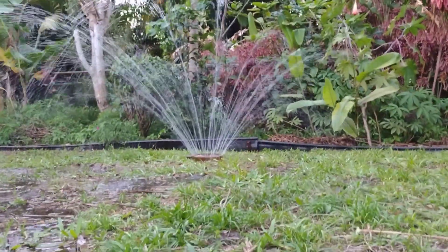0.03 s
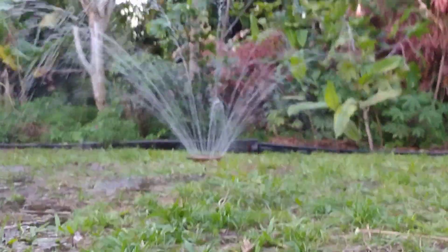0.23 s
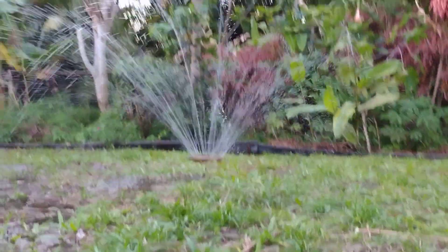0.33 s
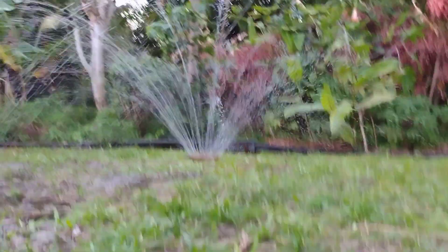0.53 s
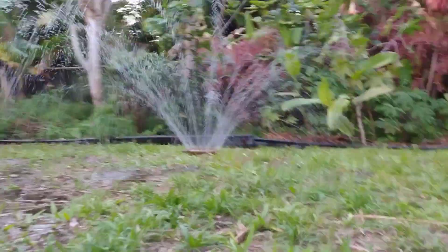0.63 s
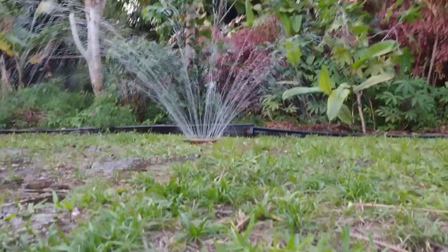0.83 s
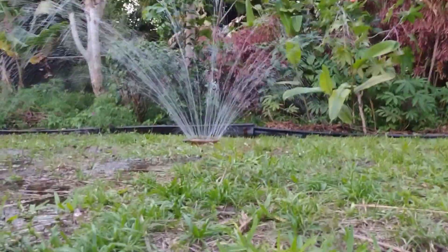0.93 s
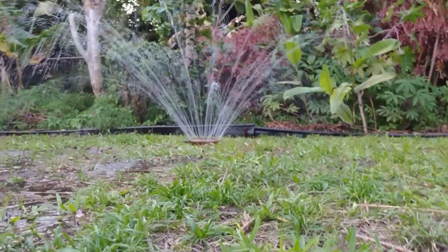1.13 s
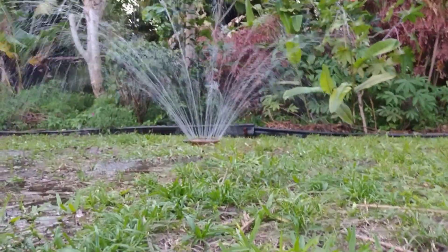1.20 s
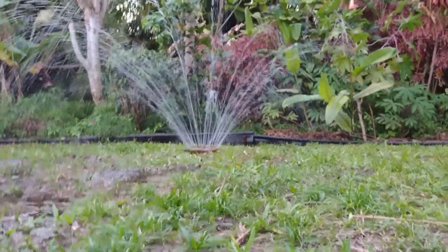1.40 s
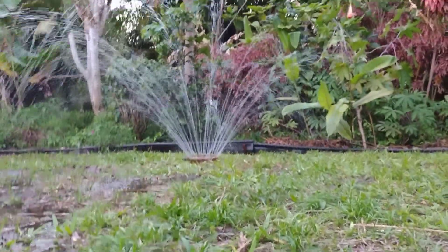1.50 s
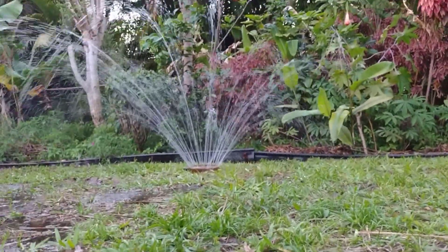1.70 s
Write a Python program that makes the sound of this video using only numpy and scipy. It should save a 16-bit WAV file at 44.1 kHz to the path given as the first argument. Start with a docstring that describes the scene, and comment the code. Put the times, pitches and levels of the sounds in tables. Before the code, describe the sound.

Steady sprinkler spray pattering on grass over low wind rumble, interrupted by close handling rustle and ticks.

```python
"""A garden sprinkler hisses and patters on a lawn, over a low rumble of wind.
The water is steady noise plus many tiny rings, one for each drop; the wind is low filtered noise.
Then something, probably a hand, rubs close to the right microphone: a few scuffs, a swelling rustle
of tiny slips with a bright swish, soft bumps and sharp ticks. They are noise bursts and short rings.
Over the first second the spray slowly fades into a slightly different colour."""
import sys
import numpy as np
from scipy import signal
from scipy.fft import rfft, irfft
from scipy.io import wavfile

SR = 44100
rng = np.random.default_rng(int(sys.argv[2]) if len(sys.argv) > 2 else 0)


def dump(signal):
    """Clip the signal to [-1, 1] and save it as 16-bit WAV at the path in sys.argv[1]."""
    limited = np.clip(np.atleast_2d(signal).T, -1, 1)
    pcm = np.round(limited * 32767).astype(np.int16)
    wavfile.write(sys.argv[1], SR, pcm)


N = 77175  # length in samples, 1.75 s
T = np.arange(N) / SR  # time of every sample, s

# Colour of the spray, before its level curve, early and late:
# pitch_hz, then early_left, early_right, late_left, late_right (all dB per Hz)
SPRAY_COLOUR = [(830,-99,-97,-94.5,-94), (1460,-108,-104,-103,-99.5), (2170,-108,-103,-104,-99),
                (2930,-109,-95.5,-105,-88), (3180,-109,-99,-104.5,-94.5), (4210,-107,-91,-103.5,-93),
                (4920,-105,-91.5,-101.5,-105), (6490,-106,-105,-97.5,-110), (7500,-110,-114,-108,-117),
                (9100,-108,-117,-105,-113), (13000,-116,-112,-113,-109.5)]
# Slow changes in the strength of the spray: time_s, left_db, right_db
SPRAY_LEVEL = [(0,-0.4,-1.1), (1.37,1.5,0.35), (1.5,-2.5,-1)]
# Colour of the fine sharp drops: pitch_hz, relative_db
FINE_COLOUR = [(5000,-10), (9500,14), (15000,15)]
TURN_START_S, TURN_END_S = 0.049, 1  # the spray fades from early to late colour
DROPS_PER_S, DROP_SPREAD_DB = 3500, 4
PATTER_SHARE = 0.38  # part of the water's power that is patter, before colouring
DROP_CYCLES, DROP_LOW_HZ, DROP_HIGH_HZ = 9.5, 1670, 16200
FINE_DROPS_PER_S, FINE_DB = 60, -82  # dB before the spray's level curve

# Strength of the rub: time_s, left_db, right_db
RUB_LEVEL = [(.45,-66,-72), (.52,-57.5,-57.5), (.585,-61,-55.5), (.64,-55,-47), (.675,-43.5,-46.5),
             (.69,-48.5,-38), (.745,-48.5,-41), (.775,-42,-34.5), (.795,-51,-37.5), (.818,-42.5,-31),
             (.885,-55,-42.5), (.925,-44.5,-31), (.955,-47,-37.5), (.972,-63,-52.5), (1.04,-57,-49),
             (1.11,-67,-61.5)]
# Colour of the rub: pitch_hz, left_db, right_db
RUB_COLOUR = [(298,5,-3.5), (610,-3,-10.5), (747,5,-1), (930,-0.5,-5.5), (1490,1.5,-1), (1920,1.5,3),
              (2730,-7,3), (4290,-13.5,-7.5), (5440,-7.5,-29), (7560,-24,-30.5)]
# Low rumble of the rubbed camera body: time_s, left_db, right_db
BODY_LEVEL = [(.48,-53.5,-54), (.56,-54.5,-53), (.76,-66,-54), (.83,-40,-35), (.88,-44,-44),
              (.97,-46,-45.5), (1.07,-49.5,-51)]
# Colour of that rumble: pitch_hz, relative_db
BODY_COLOUR = [(50,-20), (175,3.5), (270,-11), (900,-24)]
RUB_EDGE_DB_PER_S = 250  # how fast rub sounds fall away outside their tables
SLIPS_PER_S, SLIP_SPREAD_DB = 3500, 2
AIR_PEAK_S, AIR_WIDTH_S = 0.75, 0.16  # airy top of the rub
AIR_RIGHT_DB, AIR_LEFT_DB = -69, -78

# Strength of the bright swish: time_s, left_db, right_db
SWISH_LEVEL = [(.5,-60.5,-65), (.52,-50.5,-64), (.58,-69,-65), (.652,-68,-59), (.672,-44,-47),
               (.72,-70,-53), (.77,-68,-46.5), (.82,-67,-45.5), (.85,-66,-49)]
# Sinking centre of the swish: time_s, pitch_hz
SWISH_PITCH = [(.66,5830), (.77,4630), (.84,3520)]
SWISH_WIDTH_HZ = 2080  # width of each of its two resonances

# Short scuffs: start_s, length_s, left_db, right_db
SCUFFS = [(0.248,0.0057,-49.5,-69), (0.257,0.0089,-59.5,-70), (0.283,0.06,-59,-82),
          (0.392,0.016,-61.5,-57.5), (0.421,0.0066,-53.5,-94), (0.5605,0.0038,-46,-43.5)]
# Colour of the scuffs: pitch_hz, relative_db
SCUFF_COLOUR = [(400,6.5), (2500,11), (6500,9), (9000,-10)]

# Close ticks of drops and of the grip: start_s, pitch_hz, spatter_decay_s, left_db, right_db
TICKS = [(0.5554,1950,0.0009,-31,-24), (0.8576,10800,0.0006,-32,-40), (.8803,10200,0.0006,-35.5,-44),
         (.898,5200,.0008,-28.5,-39), (1.0042,4300,0.0014,-37,-35), (1.003,12500,0.0012,-47,-46),
         (1.039,10300,0.0012,-46,-49), (1.1648,3550,0.0017,-48,-31), (1.206,4000,.0012,-55,-42),
         (1.3355,3100,.001,-54,-38), (1.3493,2700,0.0017,-54,-33)]
# Soft bumps, dB before the ring's rise and decay: start_s, pitch_hz, decay_s, left_db, right_db
BUMPS = [(0.276,100,0.012,-39,-60), (0.3898,179,0.0028,-28.5,-40), (.559,462,0.0034,-39,-39.5)]
RISE_S = 0.00026  # soft start of ticks and bumps
SPATTER_DB, REBOUND_S, REBOUND_DB = -8, 0.0035, -12  # dB against the tick

# Colour of the wind before its level curve: pitch_hz, level_db_per_hz
WIND_COLOUR = [(20,-108), (55,-86), (80,-75.5), (120,-74.5), (190,-73.5), (310,-86), (420,-92), (600,-100),
               (2000,-130)]
# Slow changes in the strength of the wind: time_s, level_db
GUST_LEVEL = [(0,0.5), (.35,-2), (.6,2), (1.1,2.5), (1.75,-3)]
# How alike the wind is at both microphones: pitch_hz, likeness (1 = identical)
WIND_LIKENESS = [(150,.96), (500,0.83)]

EDGE_HZ = 15800  # upper limit of the whole sound


def spray():
    """The smooth hiss of the jets and the patter of drops on grass, with fine sharp drops on top."""
    hiss = np.sqrt(1 - PATTER_SHARE) * rng.standard_normal((2, N))
    water = hiss + np.sqrt(PATTER_SHARE) * patter()
    early_and_late = colour(np.vstack([water, water]), SPRAY_COLOUR) * np.sqrt(SR / 2)
    early, late = early_and_late[:2], early_and_late[2:]
    turn = np.interp(T, [TURN_START_S, TURN_END_S], [0, 1])
    fine_drops = grains(FINE_DROPS_PER_S, spread_db=2.2, smear_s=0.0007)
    fine = unit(colour(fine_drops, FINE_COLOUR))
    return level(SPRAY_LEVEL) * ((1 - turn) * early + turn * late + amp(FINE_DB) * fine)


def patter(count=36):
    """Each drop hits a blade of grass: a short ring at one of 36 pitches, unequal at the microphones."""
    out = np.zeros((2, N))
    t = np.arange(SR // 50) / SR
    hits = sizes(DROPS_PER_S, DROP_SPREAD_DB) * rng.uniform(-0.87, 1, (2, N))
    blade = rng.integers(0, count, N)
    for k, hz in enumerate(np.geomspace(DROP_LOW_HZ, DROP_HIGH_HZ, count)):
        drop = ring(t, hz, DROP_CYCLES / hz / 2, 1 / hz)
        drops = signal.fftconvolve(hits * (blade == k), drop[None], axes=1)[:, :N]
        out += np.sqrt(hz) * unit(drops)
    return unit(out)


def rub():
    """Dense little slips sound through the microphone ports and shake the camera body."""
    slips = grains(SLIPS_PER_S, SLIP_SPREAD_DB, smear_s=0.0022)
    rasp = unit(band(colour(slips, RUB_COLOUR), lo_hz=324, hi_hz=8640))
    rasp *= level(RUB_LEVEL, RUB_EDGE_DB_PER_S)
    rumble = colour(rng.standard_normal((2, N)), BODY_COLOUR)
    body = unit(band(rumble, lo_hz=40, hi_hz=920)) * level(BODY_LEVEL, RUB_EDGE_DB_PER_S)
    air = unit(band(rng.standard_normal(N), lo_hz=12600, hi_hz=16700))
    air *= np.exp(-((T - AIR_PEAK_S) / AIR_WIDTH_S) ** 2)
    return rasp + body + air * amp([[AIR_LEFT_DB], [AIR_RIGHT_DB]])


def swish():
    """The bright hiss of the rub: a broad resonance that sinks as the contact closes over the ports."""
    hz = np.interp(T, *np.transpose(SWISH_PITCH))
    hiss = resonate(rng.standard_normal((2, N)), hz, SWISH_WIDTH_HZ)
    hiss = resonate(hiss, hz, SWISH_WIDTH_HZ)
    return unit(hiss) * level(SWISH_LEVEL, RUB_EDGE_DB_PER_S)


def scuffs():
    """Brief slides of the grip: rough grains switched on for a moment."""
    gate = np.zeros((2, N))
    for s, length_s, left, right in SCUFFS:
        gate += amp([[left], [right]]) * (T >= s) * (T < s + length_s)
    rough = grains(per_s=3800, spread_db=0, smear_s=0.00044)
    return gate * unit(colour(rough, SCUFF_COLOUR))


def knocks():
    """A tick is a short ring with a wide spatter and a weaker rebound; a bump is a lower, plain ring."""
    out = np.zeros((2, N))
    t = np.arange(SR // 10) / SR
    for s, hz, decay_s, left, right in TICKS:
        spatter = unit(band(rng.standard_normal((2, len(t))), hz * 0.68, hz * 1.45))
        spatter *= np.exp(-t / decay_s)
        tone = ring(t, hz, decay_s / 2, RISE_S)
        tick = amp([[left], [right]]) * (tone + amp(SPATTER_DB) * spatter)
        add(out, s, tick)
        add(out, s + REBOUND_S, amp(REBOUND_DB) * tick)
    for s, hz, decay_s, left, right in BUMPS:
        add(out, s, amp([[left], [right]]) * ring(t, hz, decay_s, RISE_S))
    return out


def wind():
    """Low rumble of moving air, partly shared by both microphones and more alike at low pitches."""
    a, b = rfft(rng.standard_normal((2, N)))
    same = read(WIND_LIKENESS, np.fft.rfftfreq(N, 1 / SR))[0]
    right = same * a + np.sqrt(1 - same ** 2) * b
    air = irfft(np.array([a, right]), N)
    return colour(air, WIND_COLOUR) * np.sqrt(SR / 2) * level(GUST_LEVEL)


def sizes(per_s, spread_db):
    """Impacts at random moments: many small ones, few large."""
    strength = amp(spread_db * np.minimum(rng.exponential(1, N), 3.6))
    return strength * (rng.random(N) < per_s / SR)


def grains(per_s, spread_db, smear_s):
    """Tiny impacts, each smeared into a fading noise burst that differs at each microphone."""
    impact_power = sizes(per_s, spread_db) ** 2 * rng.random((2, N))
    power = signal.lfilter([1], [1, -np.exp(-2 / (smear_s * SR))], impact_power)
    return unit(np.sqrt(power) * rng.standard_normal((2, N)))


def ring(t, hz, decay_s, rise_s):
    """A strongly damped vibration with a soft start."""
    return (1 - np.exp(-t / rise_s)) * np.exp(-t / decay_s) * np.sin(2 * np.pi * hz * t)


def resonate(x, hz, width_hz):
    """A resonance whose centre follows the curve hz, with gain 1 at the centre."""
    turn = np.exp(2j * np.pi * np.cumsum(hz) / SR)
    r = np.exp(-np.pi * width_hz / SR)
    # shift the centre down to 0 Hz, smooth, and shift it back up
    return 2 * (turn * signal.lfilter([1 - r], [1, -r], x / turn)).real


def colour(x, points):
    """Filters with the spectrum of a table, without any sound ahead of its cause."""
    log_gain = np.log(amp(read(points, abs(np.fft.fftfreq(4096, 1 / SR)))))
    # the Hilbert transform gives the minimum phase
    taps = np.fft.ifft(np.exp(np.conj(signal.hilbert(log_gain)))).real[:, :2048]
    return signal.fftconvolve(x, taps, axes=1)[:, :N]


def band(x, lo_hz, hi_hz, order=2):
    """Keeps the pitches between two limits."""
    sos = signal.butter(order, [lo_hz, min(hi_hz, SR / 2 - 1000)], "band", fs=SR, output="sos")
    return signal.sosfilt(sos, x)


def read(points, hz):
    """Each column of a pitch table at the given frequencies."""
    f, *cols = np.transpose(points)
    return np.array([np.interp(np.log(hz + 1), np.log(f + 1), c) for c in cols])


def level(points, edge_db_per_s=0):
    """Gain curves from a level table, held beyond its ends or falling away at the given rate."""
    s, *cols = np.transpose(points)
    outside = np.maximum(s[0] - T, 0) + np.maximum(T - s[-1], 0)
    return amp(np.array([np.interp(T, s, c) for c in cols]) - edge_db_per_s * outside)


def amp(db):
    """Decibels to gain."""
    return 10 ** (np.asarray(db) / 20)


def unit(x):
    """Scales each channel to an average (rms) strength of 1."""
    return x / np.sqrt(np.mean(x ** 2, -1, keepdims=True) + 1e-20)


def add(mix, s, sound):
    """Adds a stereo sound at a time in seconds."""
    part = mix[:, round(s * SR):][:, :sound.shape[1]]
    part += sound[:, :part.shape[1]]


def scene():
    """Water and wind with the handling sounds in front."""
    return spray() + rub() + swish() + scuffs() + knocks() + wind()


def record(dry):
    """A steep low-pass filter: the recorder takes in nothing much above the edge."""
    taps = signal.firwin(511, EDGE_HZ, window=("kaiser", 9), fs=SR)
    return signal.oaconvolve(dry, taps[None], "same")


dry = scene()
out = record(dry)
dump(out)
```